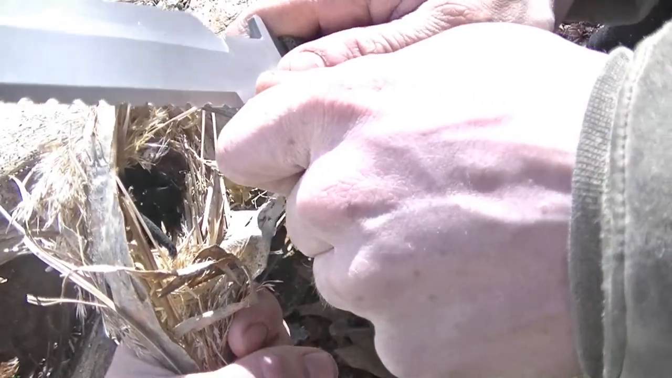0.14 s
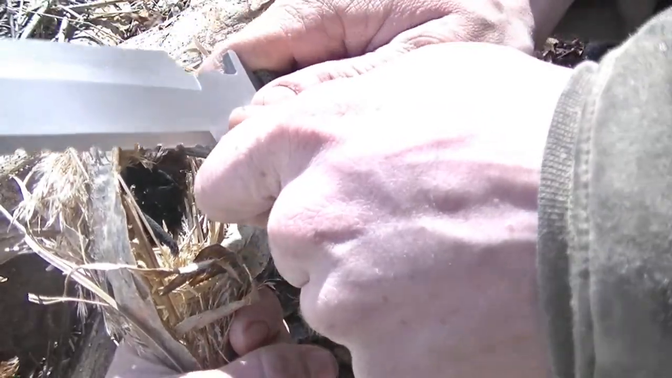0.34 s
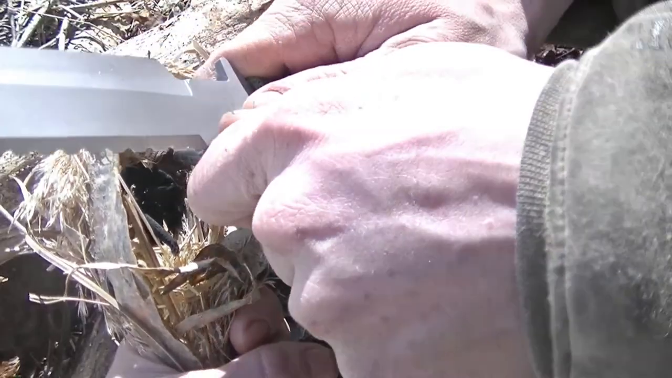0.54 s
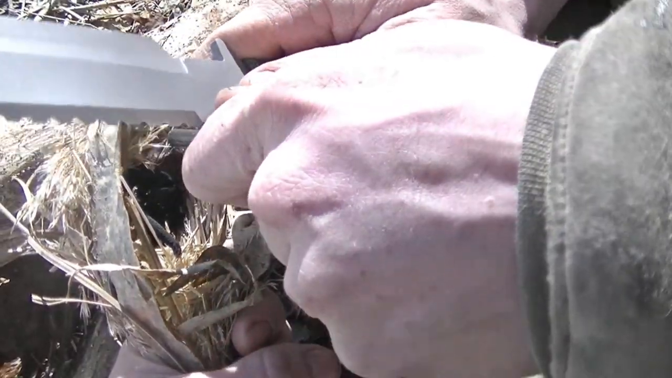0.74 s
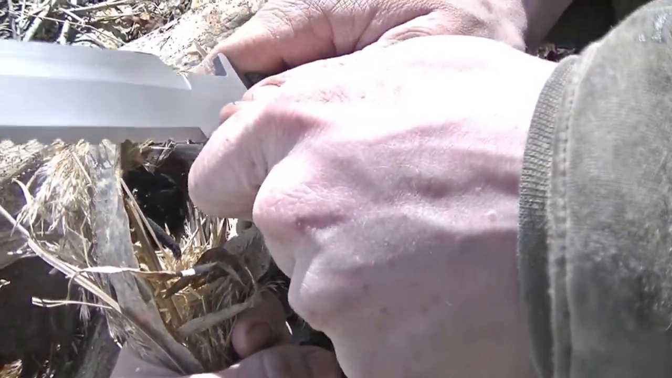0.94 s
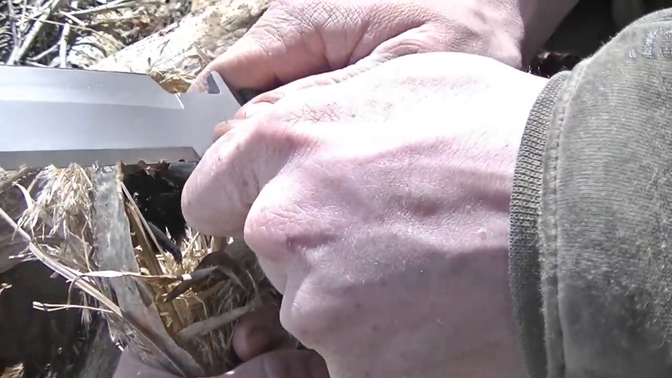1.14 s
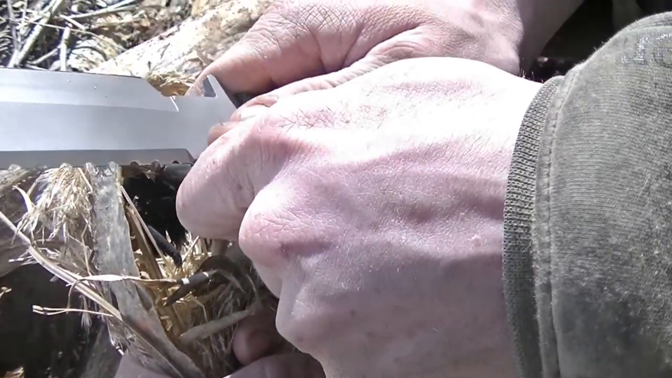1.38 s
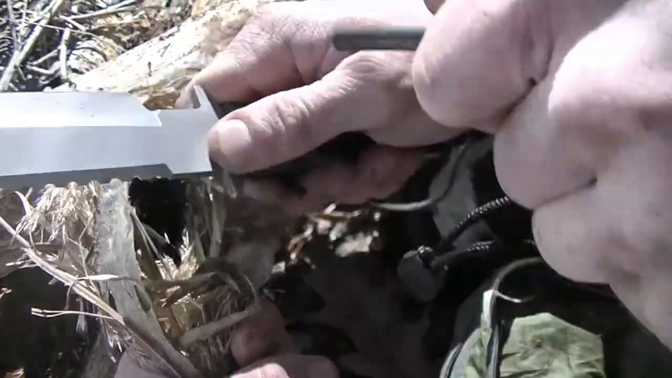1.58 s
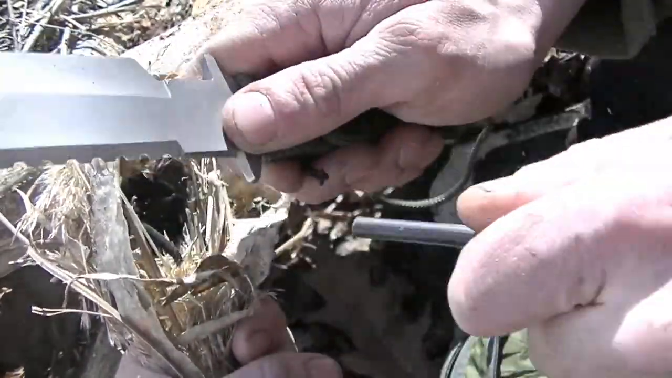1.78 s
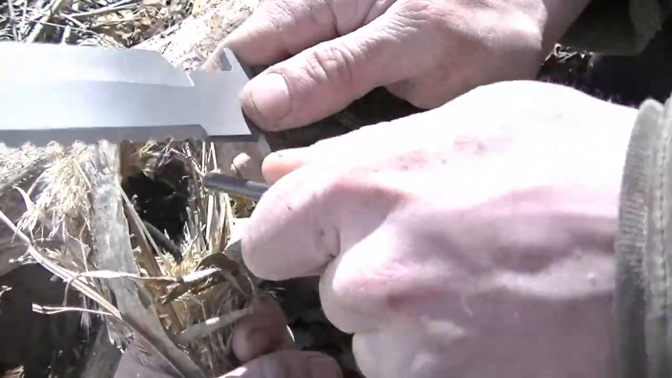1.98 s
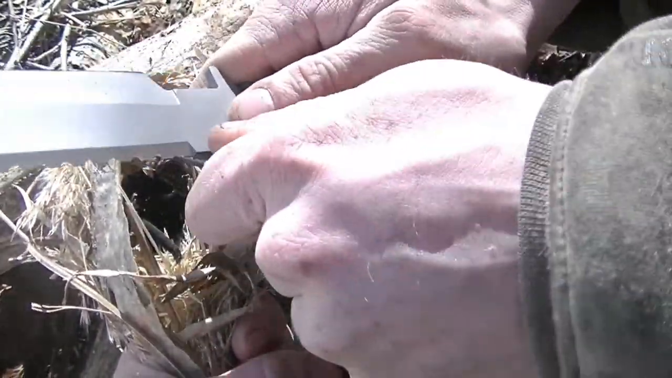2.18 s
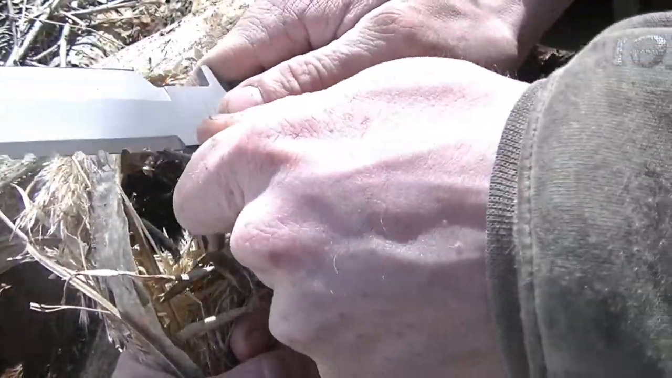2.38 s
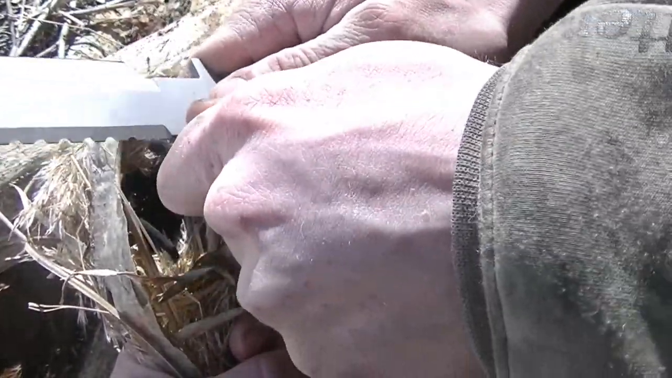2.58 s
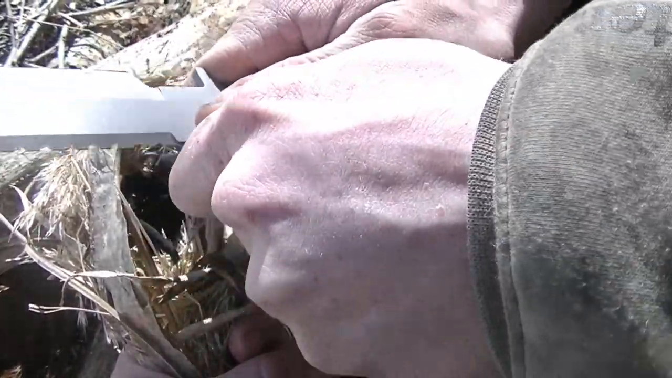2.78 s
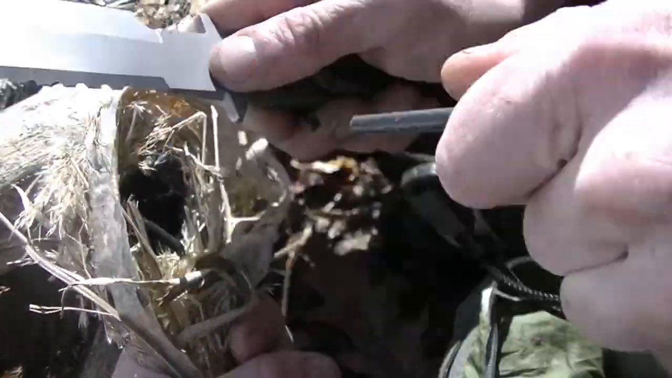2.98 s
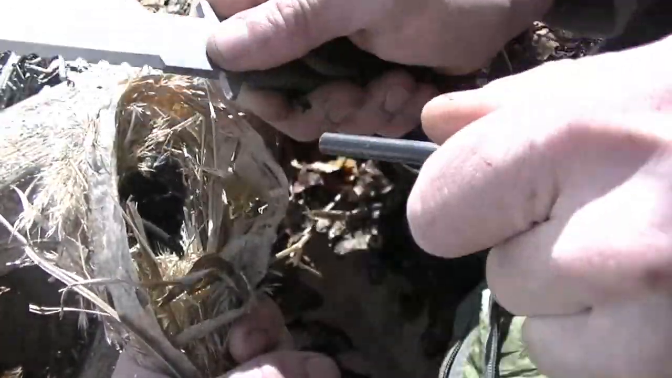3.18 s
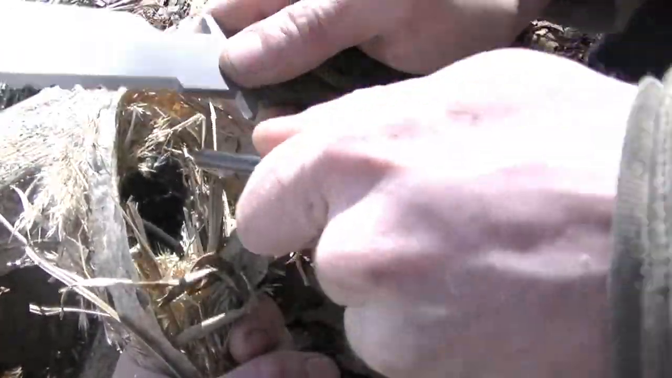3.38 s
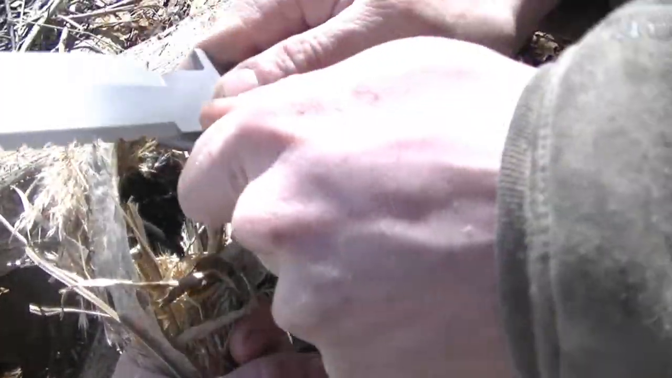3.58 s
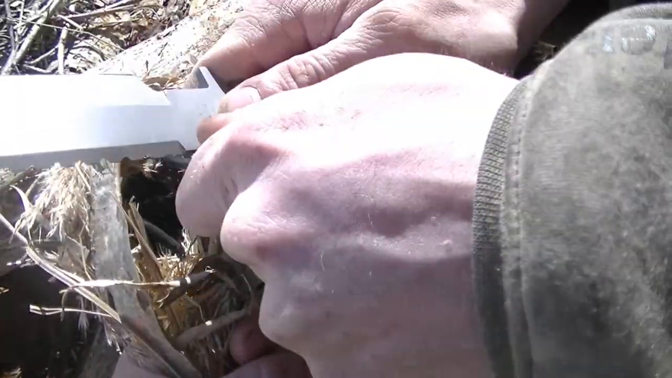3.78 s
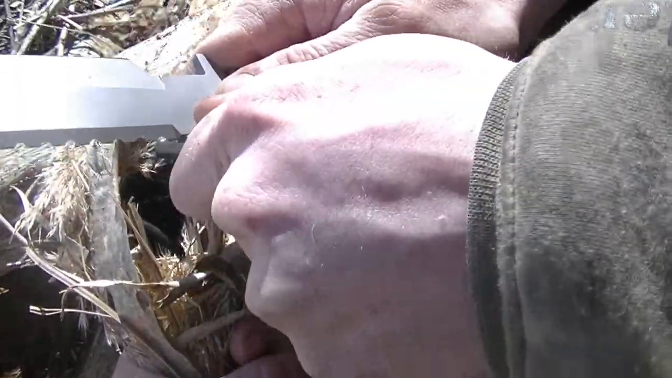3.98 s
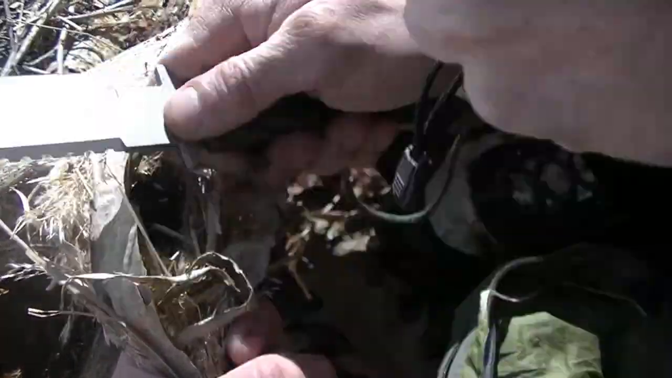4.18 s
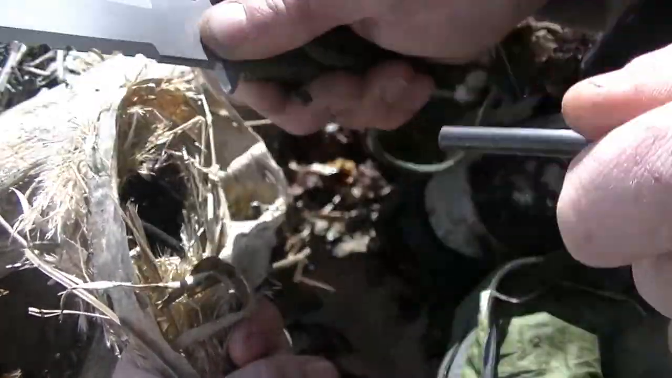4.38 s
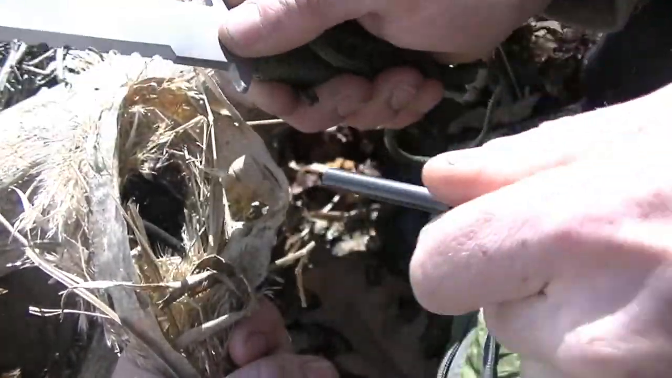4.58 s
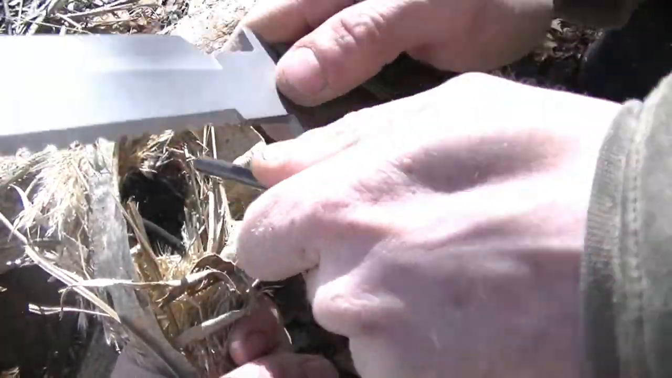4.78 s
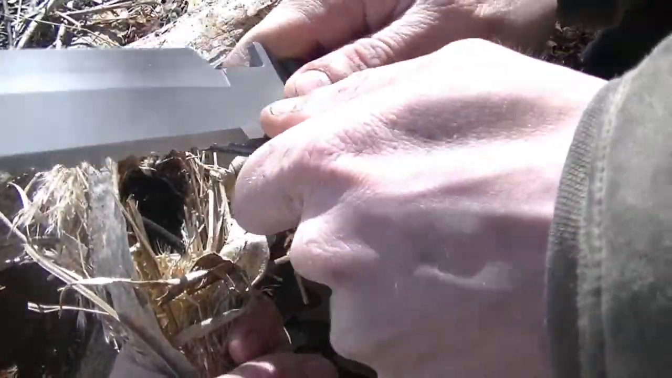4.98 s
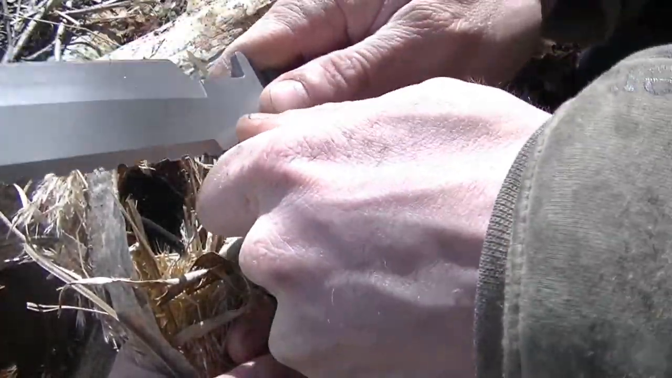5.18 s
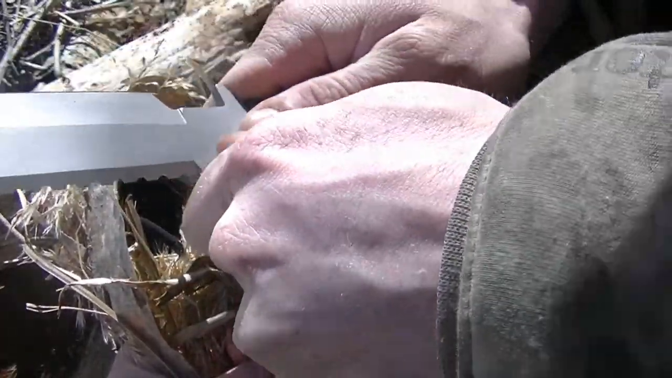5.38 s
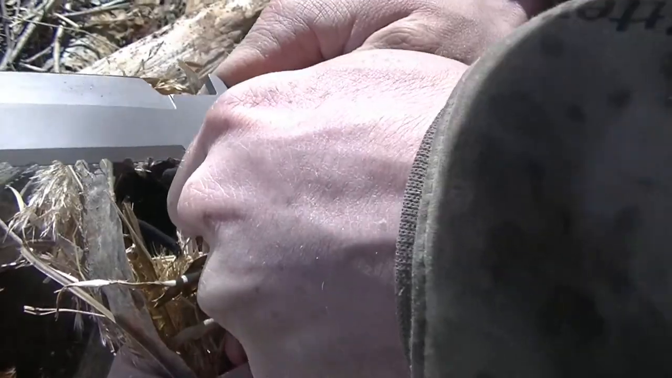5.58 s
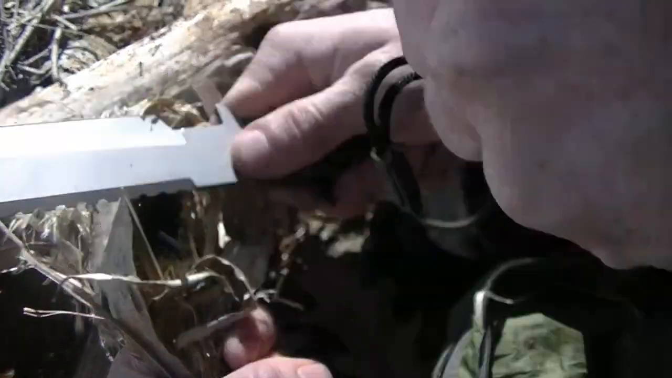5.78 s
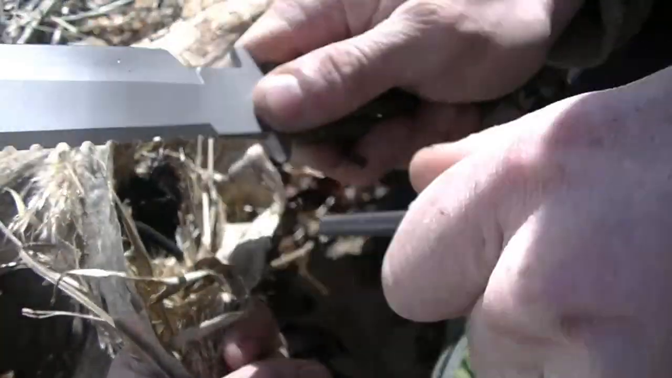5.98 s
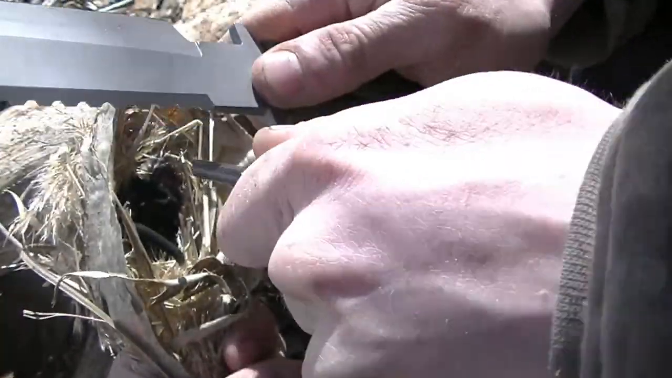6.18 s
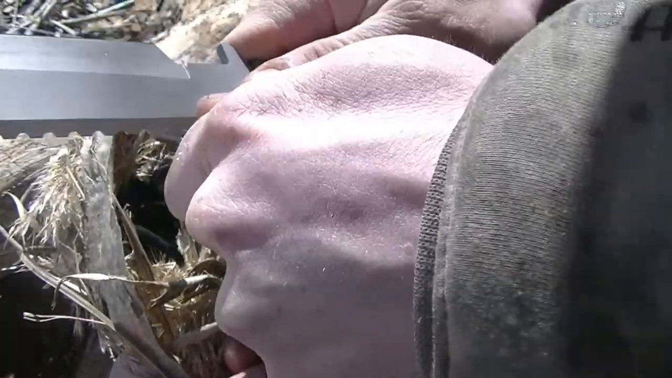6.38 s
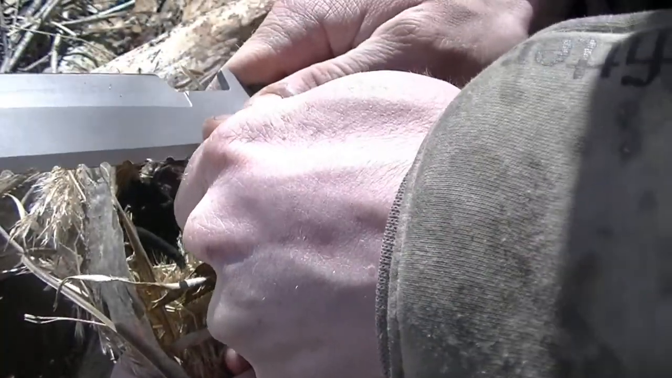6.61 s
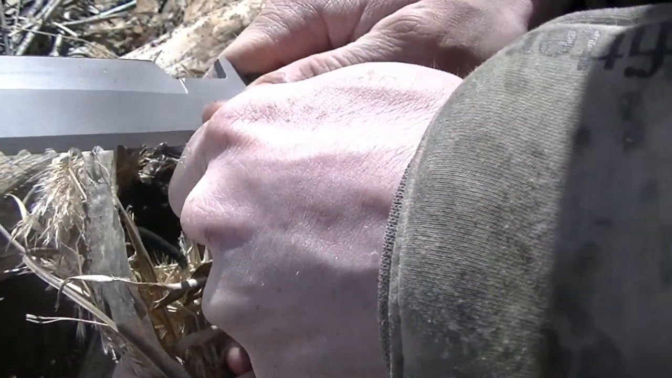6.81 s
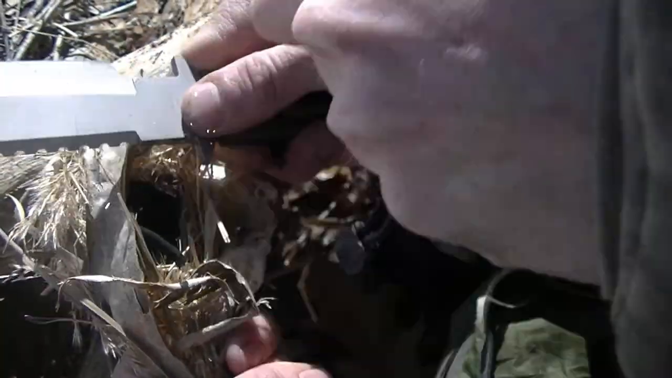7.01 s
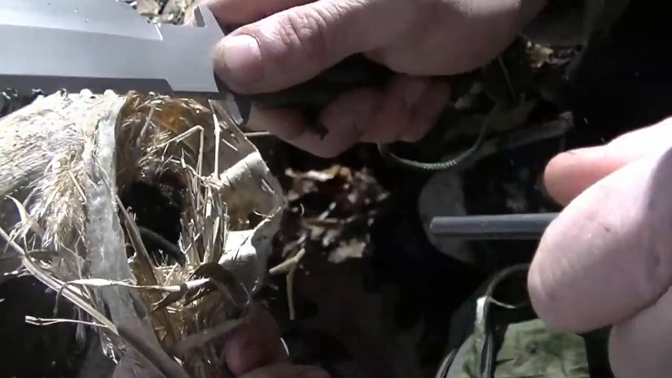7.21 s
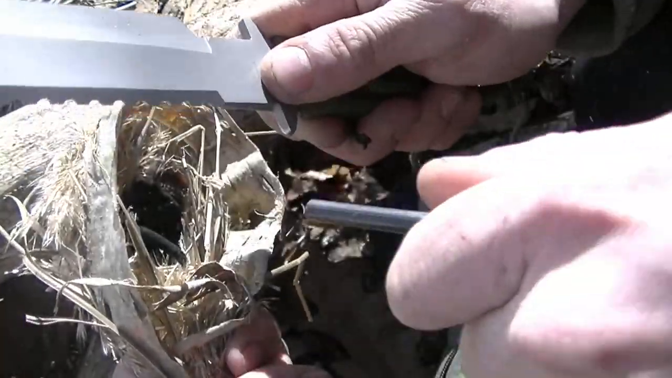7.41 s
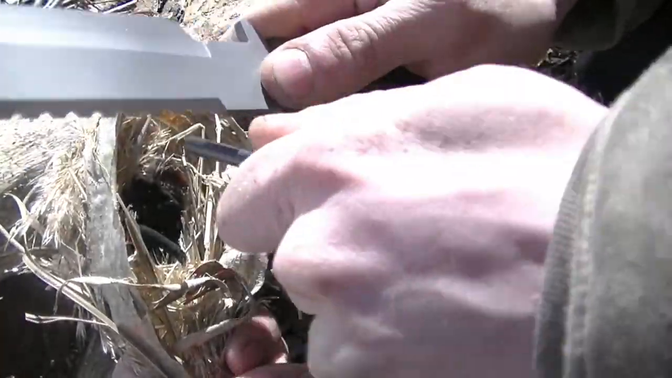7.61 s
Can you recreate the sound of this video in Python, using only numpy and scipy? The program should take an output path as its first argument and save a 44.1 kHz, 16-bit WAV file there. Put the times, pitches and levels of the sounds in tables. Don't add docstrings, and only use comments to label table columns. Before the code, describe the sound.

After a quiet opening with a few tiny ticks, five abrupt steel scrapes arrive over a second apart, the fourth building hard and the last snapping loudest. Cloth swishes follow each, with crisp clicks as rod and knife touch, and one looser drop with a bounce and a high ping. Close and dry, over low rumble, dry-leaf hiss and a faint regular camera-motor buzz.

```python
import sys
import numpy as np
from scipy import signal
from scipy.fft import rfft, irfft, next_fast_len
from scipy.io import wavfile

SR = 44100
rng = np.random.default_rng(int(sys.argv[2]) if len(sys.argv) > 2 else 0)


def volts(x):
    e = np.asarray(x, float) / 20
    return 10 ** e


def dump(signal):
    limited = np.clip(np.atleast_2d(signal).T, -1, 1)
    pcm = np.round(limited * 32767).astype(np.int16)
    wavfile.write(sys.argv[1], SR, pcm)


N = 337365


def rms_one(x):
    return x / np.sqrt(np.mean(x ** 2) + 1e-20)


def at_hz(points, hz):
    point_hz, value = np.transpose(points)
    return np.interp(np.log(hz), np.log(point_hz), value)


def high_pass(x, hz):
    return signal.sosfilt(signal.butter(4, hz, "high", fs=SR, output="sos"), x)


def drift(rate_hz):
    r = np.exp(-80 * np.pi * rate_hz / SR)
    noise = rng.standard_normal(N // 40 + 2002)
    slow = signal.lfilter([1], [1, -2 * r, r * r], noise)[2000:]
    return np.interp(np.arange(N) / 40, np.arange(len(slow)), rms_one(slow))


def ring(clicks, hz, t60_s):
    r = volts(-60 / (t60_s * SR))
    w = 2 * np.pi * hz / SR
    return signal.lfilter([0, np.sin(w)], [1, -2 * r * np.cos(w), r * r], clicks + 1e-18)


def grains(per_s, spread_db):
    sizes = volts(spread_db * np.minimum(rng.exponential(1, N), 5))
    signs = rng.choice([-1, 1], N)
    return rms_one(sizes * signs * (rng.random(N) < per_s / SR))


def bank(sources, spectrum, gain_of_band):
    edges_hz = 20 * 2 ** np.arange(0, 9.9, .4)
    out = 0
    for k, (low, high) in enumerate(zip(edges_hz, edges_hz[1:])):
        hz = np.sqrt(low * high)
        if hz > spectrum[0][0]:
            band_pass = signal.butter(2, [low, high], "band", fs=SR, output="sos")
            band = signal.sosfilt(band_pass, sources[k % 2])
            out = out + volts(at_hz(spectrum, hz)) * gain_of_band(hz, band)
    return out


def plateau(gains, start, end, levels_db, rise_db_per_s, fall_db_per_s):
    on = slice(round((start - .06) * SR), round((end + .06) * SR))
    t = np.arange(on.start, on.stop) / SR
    ramp_db = -rise_db_per_s * np.maximum(start - t, 0) - fall_db_per_s * np.maximum(t - end, 0)
    lifted = gains.copy()
    lifted[:, on] = np.maximum(gains[:, on], [volts(db + ramp_db) for db in levels_db(t - start)])
    return lifted


# mode in Hz, width in Hz, level in dB.
STEEL_MODES = [(1540, 316, -6), (2140, 207, -49), (2500, 88, -4), (2936, 380, 8.5), (3225, 120, 3.5),
               (3475, 280, 7.5), (4050, 290, -18), (4490, 310, 4), (5090, 330, 7), (6040, 1100, 4.5),
               (6220, 430, 6), (7090, 390, 0), (7030, 790, 4.5), (8470, 870, 13), (8920, 246, 6),
               (9600, 860, -4), (10340, 120, -9), (12500, 500, -16), (14400, 2100, -43)]


def rasp():
    catches = [grains(8000, spread_db=3.5) * volts(2.2 * drift(300)) for _ in range(2)]
    groups = np.zeros((3, N))
    for k, (hz, width_hz, level_db) in enumerate(STEEL_MODES):
        uneven = volts(1.5 * drift(90))
        mode = rms_one(ring(catches[k % 2], hz, t60_s=5.8 / (width_hz + 120)))
        groups[(hz > 4100) + (hz > 7400)] += volts(level_db) * uneven * mode
    rod_top = volts(3 * drift(25)) * rms_one(ring(catches[0], 11050, t60_s=.012))
    *gains, overhang_gain = contact()
    layers = [*map(rms_one, groups), rod_top]
    steel = volts(-0.93) * np.sum(np.array(gains) * layers, axis=0)
    climb = overhang_gain * overhang(catches[1])
    hum = rms_one(high_pass(ring(catches[1], 1440, t60_s=0.0055), 1680))
    return high_pass(steel, 2880) + high_pass(climb, 2600) + volts(-21) * gains[0] * hum


# spine bites in seconds, rod slips in seconds, low blade at the slip in dB,
# gain from bite to slip in dB, rod's top mode above its ring in dB.
STROKES = [
    (1.49, 1.515, -26, 1.5, -9),
    (2.807, 2.833, -25.5, 6.5, -20),
    (4.142, 4.154, -24, 2, -15),
    (5.703, 5.733, -21, 15.5, -17),
    (6.978, 7.007, -23, 13, -5),
]
# start in Hz, pitch at the slip in Hz, level above low blade in dB,
# rod's extra in dB.
OVERHANG = [
    (2550, 3000, 0, 1.5),
    (2660, 3400, -0.5, 2),
    (2620, 3800, 0, 4),
    (2680, 3500, -2.5, -0.5),
    (2580, 4300, 3.5, 4),
]
# start in seconds, end in seconds, low blade in dB,
# upper blade above it in dB, rod ring above it in dB.
GRAZES = [
    (4.129, 4.14, -31, -7, -6.5),
    (1.69, 1.71, -66, 8, -3),
    (7.024, 7.046, -48, 12, -3),
    (3.758, 3.774, -52.5, -6, -7.5),
    (4.643, 4.663, -46, 1, -9),
    (5.765, 5.77, -39, 2, 3),
    (5.778, 5.78, -29, 9, 1.5),
]
FREE_GRAZES = [
    (4.85, 4.867, -55, -4, -6),
    (4.903, 4.928, -48.5, -1.5, -12),
    (6.416, 6.436, -45, -2, -9.5),
]


def contact():
    gains = np.zeros((5, N))
    for (bite, slip, low_db, gain_db, top_db), (*_, free_db, rod_db) in zip(STROKES, OVERHANG):
        def levels(age):
            low = low_db - gain_db * np.clip(1 - age / (slip - bite), 0, 1)
            left_s = np.clip(slip - bite - age, 0, .04)
            upper = low + 3.5 - 174 * left_s
            rod = low + rod_db - 4.5 + 200 * left_s
            late = low - 500 * np.maximum(-age, 0)
            return late, upper, rod, rod + top_db, late + free_db
        gains = plateau(gains, bite, slip, levels, rise_db_per_s=1120, fall_db_per_s=4000)
    for table, top_db in [(GRAZES, -21), (FREE_GRAZES, 2.5)]:
        for start, end, low_db, upper_db, rod_db in table:
            levels_db = low_db + np.array([0, upper_db, rod_db, rod_db + top_db, -9.0])
            gains = plateau(gains, start, end, lambda age: levels_db, rise_db_per_s=906, fall_db_per_s=906)
    return gains


def overhang(catches):
    climb_s, t60_s = 0.0075, 0.0091
    t, hz = np.arange(N) / SR, np.zeros(N)
    for (_, slip, *_), (start_hz, end_hz, *_) in zip(STROKES, OVERHANG):
        near = np.abs(t - slip) < .5
        left_s = np.maximum(slip - t[near], 0)
        hz[near] = start_hz + (end_hz - start_hz) * np.exp(-left_s / climb_s)
    turn = np.exp(2j * np.pi * np.cumsum(hz) / SR)
    envelope = signal.lfilter([1], [1, -volts(-60 / (t60_s * SR))], catches / turn)
    return rms_one(np.real(turn * envelope))


def taps(table, modes, ring_share, chatter_db, chatter_s, db_5k, choke_s=.04, crack=0.92):
    s, peak_db, db_1k6, db_3k, db_9k = np.transpose(table)
    at = np.round(s * SR).astype(int)
    luck = rng.normal(0, 1, (len(s), len(modes)))
    age = np.arange(2000) / SR
    out = np.zeros((2, N))
    for k, (hz, width_hz, level_db) in enumerate(modes):
        if hz < 2200:
            group_db = db_1k6 + 8.5
        elif hz < 4100:
            group_db = db_3k - 4
        elif hz < 5500:
            group_db = db_5k - 2.0
        elif hz < 7400:
            group_db = 0
        else:
            group_db = db_9k
        clicks = np.zeros(N)
        clicks[at] = volts(peak_db + group_db + level_db + 1.8 * luck[:, k])
        chatter = volts(chatter_db) * rng.standard_normal(600) * np.exp(-age[:600] / chatter_s)
        chatter[0] = (-1) ** k
        fall_db = -60 * age * width_hz / ring_share
        choke = np.exp(-(age / (choke_s * (1 + 2 * (hz < 2200)))) ** 4)
        decay = (crack * volts(3.46 * fall_db) + 0.3 * volts(fall_db)) * choke
        blow = np.convolve(chatter, decay * np.sin(2 * np.pi * hz * age))
        out[int(hz < 2200)] += signal.oaconvolve(clicks, blow)[:N]
    return high_pass(out[0], 1970) + out[1]


# time in seconds, peak near 6 kHz in dB,
# then modes near 1.6, 3 and 9 kHz in dB above it.
SNAPS = [
    (1.5169, -18, -6.5, 5.5, 2.5),
    (2.8331, -13, -10, -2.5, -2.5),
    (4.1572, -18, -8.5, 5.5, 3),
    (5.7356, -10.5, -37, -2.5, -4),
    (7.0098, -8, -22, -6, -1.5),
]


def snaps():
    hits = taps(SNAPS, STEEL_MODES, 2.42, chatter_db=-27.5, chatter_s=0.0028, db_5k=-12.0)
    return volts(1.5) * high_pass(hits, 950)


# time in seconds, peak in dB.
THUDS = [
    (1.5184, -45),
    (2.8325, -32),
    (2.98, -54),
    (3.557, -48.5),
    (4.159, -33.5),
    (4.271, -60),
    (5.7384, -35),
    (7.01, -36.5),
    (7.077, -43),
]


def thuds():
    clicks = np.zeros(N)
    for s, peak_db in THUDS:
        clicks[round(s * SR)] = volts(peak_db)
    knock = ring(clicks, 815, t60_s=0.012)
    knock += volts(2.0) * ring(clicks, 320, t60_s=0.0038)
    knock += volts(-21) * ring(clicks, 190, t60_s=0.023)
    return high_pass(knock, 130)


# start in seconds, end in seconds, pitch in Hz, level in dB, rise in Hz.
SQUEALS = [
    (1.554, 1.577, 2076, -44, 180),
    (1.555, 1.58, 1043, -56, 90),
    (3.826, 3.95, 3060, -62, 30),
    (5.78, 5.788, 2690, -20.5, 30),
]


def squeals():
    t, out = np.arange(N) / SR, 0
    for start, end, pitch_hz, level_db, rise_hz in SQUEALS:
        progress = (t - start) / (end - start)
        arch = np.sin(np.pi * np.clip(progress, 0, 1)) ** 0.44
        cycles = (pitch_hz + rise_hz * progress / 2) * (t - start)
        out = out + volts(level_db) * arch * np.sin(2 * np.pi * cycles)
    return out * volts(1.5 * drift(120))


# time in seconds, peak near 6 kHz in dB, then modes near 1.6, 3 and 9 kHz in dB above it.
TICKS = [(0.4057, -44, -10, -17, -16), (0.6277, -51.5, 22, 21, -4), (3.2655, -59, 10, 10, -8),
         (4.4005, -61, 6, 13, -10), (4.7335, -49, -7, 8, -13), (0.9974, -44.5, -7, -10, -14),
         (1.532, -38, -18, 7.5, 5), (1.5839, -46.5, -13, 5, 5), (1.6344, -36, -18, -3, -4),
         (2.4196, -44, -13, -7, -5), (2.6082, -49.5, -9, -1, 10), (2.6224, -48, -14, -4, -1),
         (2.7955, -38, -20, 0, 5), (2.7985, -39, -14, 2, 9), (2.8007, -36, -20, 0, 8),
         (2.8128, -38, -12, 3, 4), (1.5035, -26, -20, 6, 0), (1.548, -43, -20, -10, -3),
         (1.5505, -40, -20, -8, -3), (1.557, -45, -20, -5, 6), (6.951, -47, -17, 3, -4),
         (7.0885, -40, -15, -1, -10), (2.8553, -32, -25, -8, -12), (4.1437, -34, -18, -5, 8),
         (2.8253, -27.5, -16, 12, 2), (2.8539, -28, -27, -18, -6), (3.0145, -47, -20, -12, -5),
         (3.1308, -42, -17, -10, -23), (3.1438, -47, -12, -5, -11), (3.1623, -45, -10, -14, -15),
         (3.5575, -47.5, 6, 0, -1), (4.1469, -31.5, -26, 15, 15.5), (5.8922, -55, -36, -2, -17),
         (6.18, -47, -3, -8, -11), (4.1815, -44, -20, 11, -7), (4.188, -46, -20, 6, 0),
         (4.2125, -40, -20, 9, 0), (4.2465, -42, 3, 6, -5), (7.052, -42, -15, 8, -5),
         (7.0776, -25.5, -5, 2, -8)]


def ticks():
    hits = taps(TICKS, STEEL_MODES, 1.84, chatter_db=-25.5, chatter_s=0.0033, db_5k=-5.5)
    return high_pass(high_pass(hits, 1180), 1130)


# mode in Hz, width in Hz, level in dB.
HELD_MODES = [(1585, 83, -13.5), (2010, 890, -18.5), (2500, 440, 1), (3040, 260, 4.5), (3490, 275, 6),
              (4150, 380, -6.5), (4620, 320, 2), (4990, 260, 1), (6260, 640, 2), (6890, 550, 6.5),
              (8180, 420, 4), (8800, 600, 0.5), (11100, 340, -16.5), (12000, 400, -30)]
SETS = [
    (2.1679, -13.5, -19, 0, 3.5),
    (3.4999, -34.5, 2.5, 13, -6),
    (6.3193, -39.5, -6, -14, 1),
    (6.3199, -30, -8, 12.5, -1),
]


def sets():
    hits = taps(SETS, HELD_MODES, 4.24, chatter_db=-25.0, chatter_s=0.0016, db_5k=-3.0, choke_s=.0062)
    return high_pass(hits, 1290)


DROPS = [
    (4.8846, -12, -15, 3, 0),
    (4.8866, -21, -25, 4, -3),
]


def drops():
    hits = taps(DROPS, HELD_MODES, 4.5, chatter_db=-19.5, chatter_s=0.0015, db_5k=1.0, choke_s=0.01, crack=.6)
    return high_pass(hits, 900)


# mode in Hz, width in Hz, level in dB.
HANDLE_MODES = [(1824, 510, -12), (3060, 1000, 1), (3430, 420, -4.5), (3640, 670, -5), (4600, 260, 0),
                (4990, 280, -0.5), (6190, 270, 1), (6880, 580, 3), (8100, 660, -5.5), (8740, 340, -2.5),
                (10300, 970, 4.5), (11360, 550, -1), (12300, 450, -5), (14100, 860, -27)]
# time in seconds, peak near 6 kHz in dB, then modes near 3, 5 and 9 kHz in dB above it.
FLICKS = [
    (0.6576, -53, 9, 24, 4),
    (2.9799, -9, -23, 1.3, 4.5),
    (4.2704, -14.5, 16, 8.2, 13.5),
    (5.906, -42, 30, 5.4, -9),
    (7.133, -28, -14, 3.2, -5),
    (7.1325, -6.5, -11, 8, -11),
]


def flicks():
    low_db = -30
    rows = [(s, db, low_db, db_3k, db_9k) for s, db, db_3k, _, db_9k in FLICKS]
    db_5k = np.array(FLICKS)[:, 3]
    hits = taps(rows, HANDLE_MODES, 2.35, chatter_db=-25.5, chatter_s=0.0016, db_5k=db_5k)
    return high_pass(hits, 1300)


# time in seconds, peak in dB.
PINGS = [
    (3.4999, -44),
    (4.8856, -15),
]


def ping():
    s, peak_db = np.transpose(PINGS)
    clicks = np.zeros(N)
    clicks[(s * SR).astype(int)] = volts(peak_db)
    return ring(clicks, 10940, t60_s=0.014)


# frequency in Hz, level in dB per Hz.
CLOTH = [(410, -45), (700, -9.5), (1400, -6.5), (1600, -12), (2130, 3), (3370, 7.5), (5400, -5.5),
         (6150, -4), (9600, -14.5), (16000, -21.5)]


def rustle():
    gain, treble_gain = arm()
    rub = [grains(9000, spread_db=3.5) * volts(2.2 * drift(150)) for _ in range(2)]
    whole = rms_one(bank(rub, CLOTH, lambda hz, band: band * volts(2.4 * drift(34.0))))
    treble = signal.sosfilt(signal.butter(2, 6000, "high", fs=SR, output="sos"), whole)
    return volts(4) * (gain * (whole - treble) + volts(6.0) * treble_gain * treble)


# start in seconds, end in seconds, level in dB, brightness in dB.
SWINGS = [
    (1.512, 1.637, -44.5, 7.5),
    (1.643, 1.707, -60, 6),
    (2.838, 2.956, -45, 8.5),
    (4.159, 4.256, -42.5, 5),
    (5.75, 5.777, -39.5, 1.5),
    (5.784, 5.841, -46, 7.5),
    (7.019, 7.094, -38.5, 6),
]
# time in seconds, length in seconds, level in dB, brightness in dB.
STIRS = [(2.61, .012, -63, -3), (3.13, 0.016, -65, -5), (3.502, 0.012, -49.5, 2), (3.543, .012, -57.5, 0),
         (4.205, 0.01, -45, 8.5), (4.24, 0.0086, -46, 5), (4.752, 0.037, -64.5, 9.5),
         (5.28, 0.076, -60.5, 5.5), (5.86, 0.036, -62, 3), (7.074, .008, -45.5, 11),
         (7.104, 0.016, -49, 5.5)]


def arm():
    gains = np.zeros((2, N))
    for start, end, level_db, bright_db in SWINGS:
        def levels(age):
            jerk_db = 1.5 * np.exp(-np.abs(age) / 0.0027)
            now = level_db + jerk_db - 105 * age
            return now, now + bright_db
        gains = plateau(gains, start, end, levels, rise_db_per_s=3000, fall_db_per_s=1140)
    for s, length, level_db, bright_db in STIRS:
        levels_db = level_db, level_db + bright_db
        gains = plateau(gains, s, s + length, lambda age: levels_db, rise_db_per_s=2.3 * 611, fall_db_per_s=611)
    return gains


# frequency in Hz, left minus right in dB.
PORT_DB = [(1000, 1), (2600, -0.5), (4600, -3.5), (6300, 7), (8500, -4), (13000, -2.2)]
# frequency in Hz, left's lead in radians.
PORT_RAD = [(1000, 0.05), (2600, 0.13), (4600, 0.56), (6300, 0.68), (8500, 0.44), (13000, 2.2)]


def ports(x, echo_db):
    size = next_fast_len(N + 4096)
    hz = np.maximum(np.arange(size // 2 + 1) * SR / size, 1)
    half = volts(at_hz(PORT_DB, hz) / 2) * np.exp(.5j * at_hz(PORT_RAD, hz))
    lags_s = rng.uniform(.0004, .004, (2, 7, 1))
    echoes = volts(echo_db) * np.sum(np.exp(-lags_s / .003 - 2j * np.pi * hz * lags_s), axis=1)
    pair = irfft(rfft(x, size) * np.array([half, 1 / half]) * (1 + echoes), size)[:, :N]
    sway = 0.22 * drift(6) * [[1], [-1]]
    return pair + sway * np.gradient(pair, axis=1)


FRAME_S = 1001 / 30000
# first step in seconds, stop in seconds.
MOTOR_RUNS = [
    (0.6640, 6.61),
    (7.154, 7.65),
]
# mode in Hz, t60 in seconds, level on the step in dB, level on the after-steps in dB.
SHELL_MODES = [(1276, 0.026, -58, -64.5), (1390, 0.034, -61.5, -61), (1892, 0.034, -57.5, -62.5),
               (2550, 0.025, -59.5, -81.5), (2920, 0.018, -55.5, -59), (3145, 0.014, -55.5, -56),
               (3540, 0.0085, -52, -62.5), (4650, 0.038, -63.5, -67)]


def motor():
    steps_s = np.concatenate([np.arange(first, stop, FRAME_S) for first, stop in MOTOR_RUNS])
    load_db = 1.5 * rng.normal(0, 1, len(steps_s))
    out = np.zeros(N)
    for hz, t60_s, step_db, after_db in SHELL_MODES:
        clicks = np.zeros(N + SR)
        for lag_s, level_db, fickle_db in [(0, step_db, 2.1), (.0075, after_db - 3, 1.9), (.021, after_db - 9, 4)]:
            luck = rng.normal(0, 1, (len(steps_s), 2))
            at = ((steps_s + lag_s + .0005 * luck[:, 0]) * SR).astype(int)
            clicks[at] = volts(level_db + 1.0 + load_db + fickle_db * luck[:, 1])
        out += ring(clicks[:N], hz, t60_s)
    return out


# time in seconds, level in dB.
WHINES = [(.843, -49), (3.576, -54), (1.342, -58), (1.776, -50), (2.076, -50), (2.677, -55), (3.444, -54),
          (3.646, -50.5), (4.848, -55), (5.313, -51), (5.412, -54), (5.647, -52), (6.246, -56),
          (6.313, -51), (2.644, -51), (6.382, -53), (6.58, -53), (7.322, -54), (7.4, -51), (7.488, -57)]
# first whine in seconds, last whine in seconds, level in dB.
HUNTS = [(.976, 1.082, -51.5), (1.743, 1.97, -51), (2.045, 2.11, -49.5), (2.578, 2.604, -51),
         (3.077, 3.439, -53.5), (4.481, 4.748, -54), (4.98, 5.045, -50), (6.079, 6.241, -59),
         (6.482, 6.508, -54), (7.165, 7.431, -54)]


def whines():
    rows = list(WHINES)
    for first, last, db in HUNTS:
        rows += [(s, db) for s in np.arange(first, last + FRAME_S, 2 * FRAME_S)]
    s, level_db = np.transpose(rows)
    clicks = np.zeros(N)
    clicks[((s - .008) * SR).astype(int)] = volts(level_db + 1.5 + rng.normal(0, 0.82, len(s)))
    whine = np.hanning(700) * np.sin(2 * np.pi * 2900 * np.arange(700) / SR)
    return signal.oaconvolve(clicks, whine)[:N]


# frequency in Hz, level in dB per Hz.
AIR = [(12, -49), (20, -27.5), (104, -8), (293, -2), (357, -7.5), (388, -2.5), (660, -17), (976, -11),
       (1220, -21), (1710, -10), (1860, -11.5), (2260, -13), (2910, -10.5), (4670, -11.5), (16000, -25.5)]
# time in seconds, level in dB.
LEAVES = [(0.0, -57), (0.59, -60), (1.89, -57.5), (2.22, -59.5), (3.37, -58.5), (4.13, -61.5),
          (4.71, -57.5), (6.99, -60.5), (7.65, -58.5)]
# frequency in Hz, left-right likeness from 0 to 1.
LIKENESS = [(60, 0.3), (180, 0.9), (550, 0.73), (1650, 0.5), (4970, 0.41), (15000, 0.047)]


def outdoors():
    s, leaf_db = np.transpose(LEAVES)
    stir_db = np.interp(np.arange(N) / SR, s, leaf_db) + 60 + 1.54 * drift(25)

    def spread(hz, band):
        alike = np.clip(at_hz(LIKENESS, hz), 0, 1)
        leaf_share = np.clip(np.log(hz / 1500) / 0.92, 0, 1) * np.clip(np.log(15000 / hz) / 0.74, 0, 1)
        pair = np.sqrt(1 + alike) * band[0] + np.sqrt(1 - alike) * band[1] * [[1], [-1]]
        return pair * volts(leaf_share * stir_db + .7 * drift(8))

    noise = rng.standard_normal((2, 2, N))
    return volts(-56) * rms_one(bank(noise, AIR, spread))


# width in seconds, level in dB.
GUST = (0.029, -57)


def gust():
    peak_s, (width_s, level_db) = 5.555, GUST
    age = np.maximum(np.arange(N) / SR - peak_s + width_s, 0) / width_s
    return volts(level_db) * age * np.exp(1 - age) * np.sin(2 * np.pi * 55 * width_s * age ** 0.82)


def scene():
    stroke = rasp() + snaps() + squeals() + thuds()
    handling = ticks() + sets() + drops() + flicks() + ping()
    near = ports(stroke, echo_db=-30.0) + ports(handling, echo_db=-27.0) + ports(rustle(), echo_db=-44)
    camera = (motor() + whines()) * volts(np.array([[.4], [-.4]]))
    return near + camera + outdoors() + gust()


def low_pass(x):
    return signal.sosfilt(signal.butter(12, 17070, fs=SR, output="sos"), x)


def record(dry):
    rounded = dry / (1 + dry ** 4) ** (1 / 4)
    top_cut = signal.cheby2(10, 70, 17300, fs=SR, output="sos")
    return low_pass(signal.sosfilt(top_cut, rounded))


dry = scene()
out = record(dry)
dump(out)
```